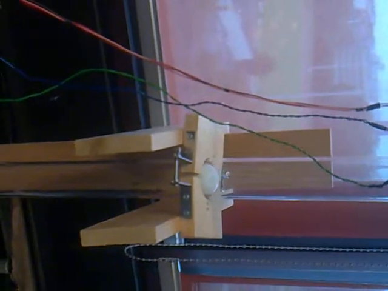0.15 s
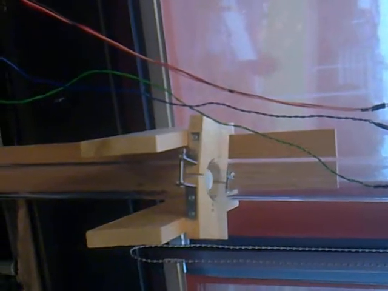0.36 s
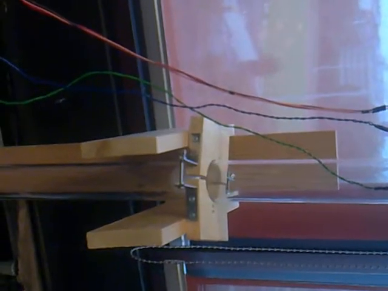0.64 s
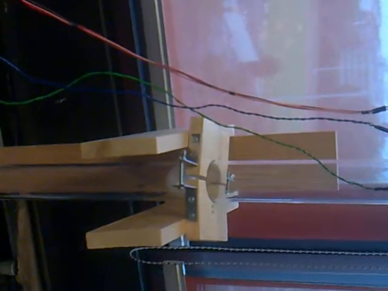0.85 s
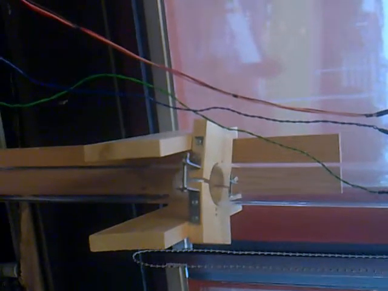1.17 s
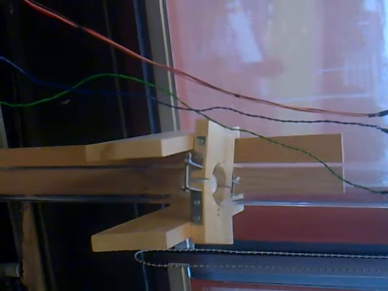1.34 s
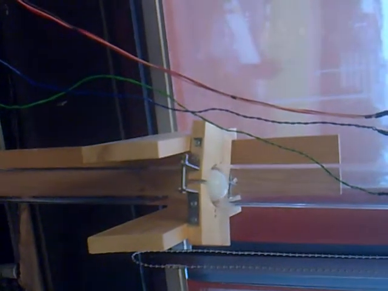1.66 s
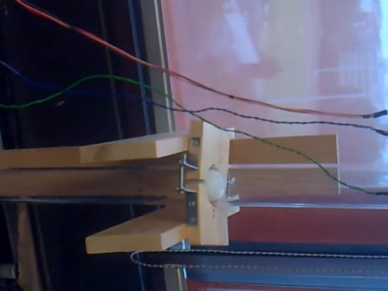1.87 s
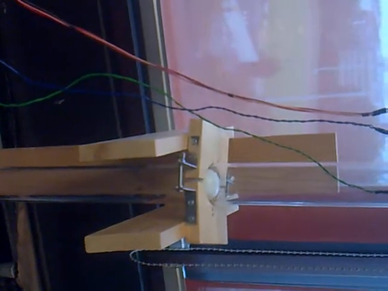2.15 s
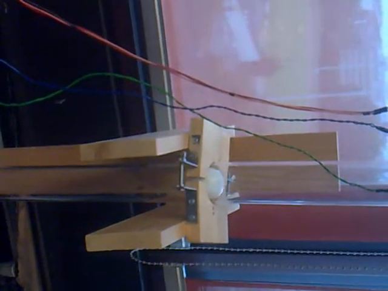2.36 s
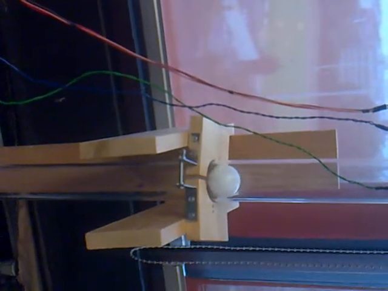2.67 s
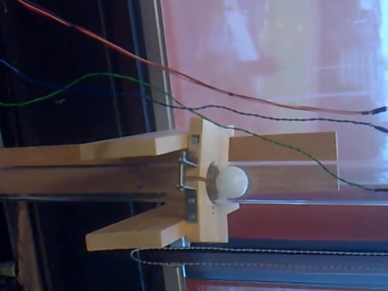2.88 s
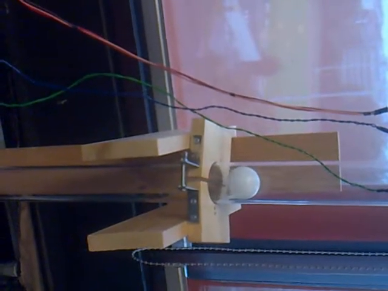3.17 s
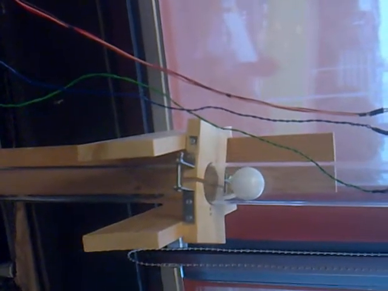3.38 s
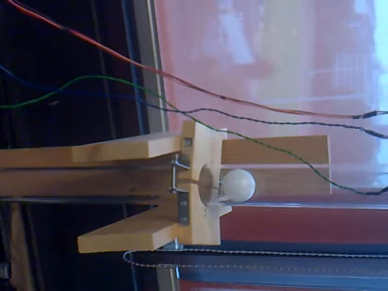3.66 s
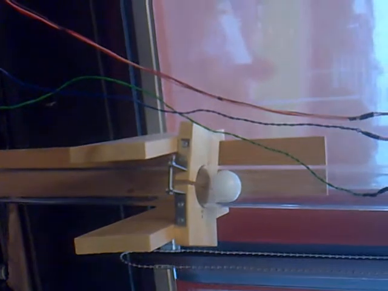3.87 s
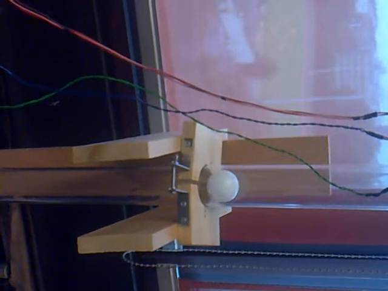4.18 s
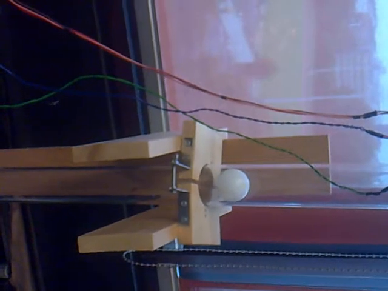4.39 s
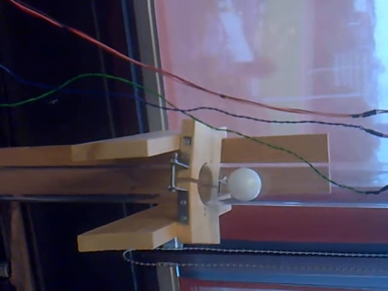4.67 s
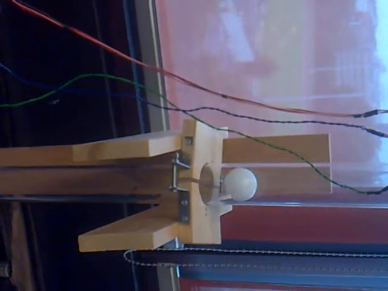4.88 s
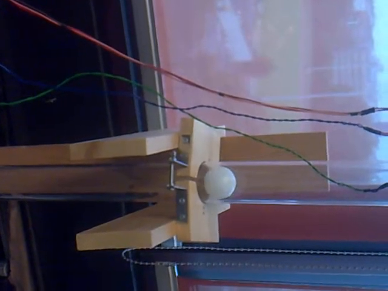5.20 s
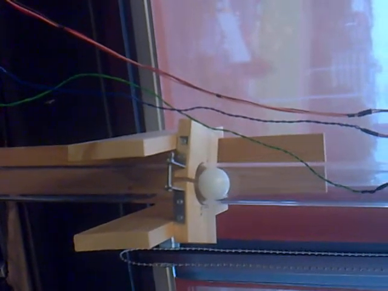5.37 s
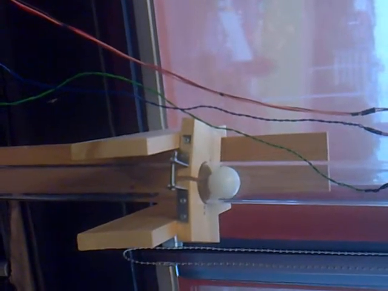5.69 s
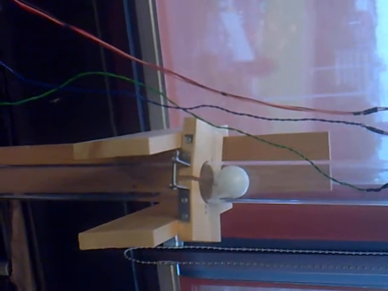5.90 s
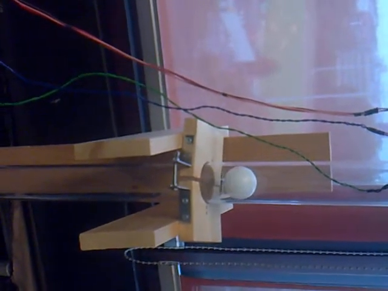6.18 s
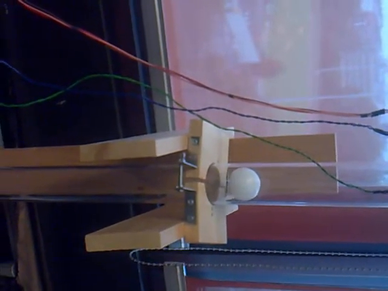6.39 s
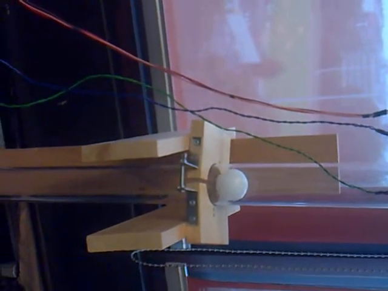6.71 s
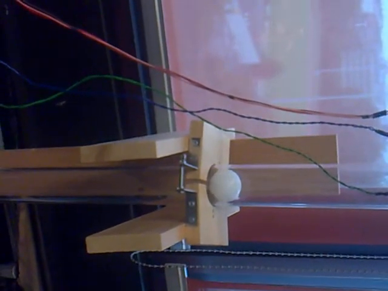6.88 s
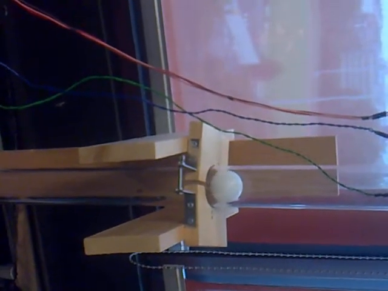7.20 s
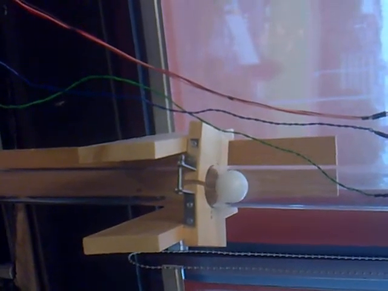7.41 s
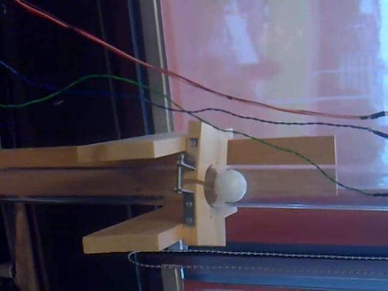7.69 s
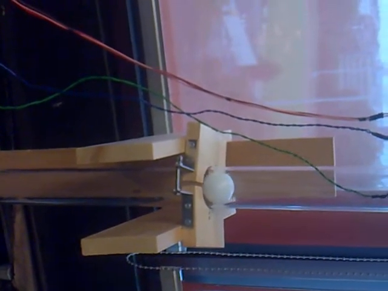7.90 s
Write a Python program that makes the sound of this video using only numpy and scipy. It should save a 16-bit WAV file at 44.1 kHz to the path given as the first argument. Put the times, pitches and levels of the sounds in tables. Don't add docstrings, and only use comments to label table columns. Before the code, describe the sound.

A faint, steady hiss of a fan and air jet, with a thin wavering motor hum, runs throughout a hard-walled room. A light hollow ball strikes a wooden stop with a moderate clack at 0.2 s, a weaker glance following, then faint touches and a duller knock at 1.35 s. Around 2.1-2.3 s comes a soft quick flurry while the tube very faintly drones low. At 3.4 s a tight triple rap cracks out, by far the loudest, with a low woody boom, followed by another knock at 3.55 s. Light touches lead to a double rap at 4.4 s and a soft knock at 4.95 s. Firm knocks land at 5.77 and 6.17 s, then a quiet patter from 6.7 to 7.1 s and barely audible taps until about 7.7 s. Hiss continues to 8 s. Every hit is indirect, blooming into brief, dense echoes that decay within half a second.

```python
import sys
import numpy as np
from scipy import signal
from scipy.fft import rfft, irfft
from scipy.io import wavfile
from scipy.ndimage import uniform_filter1d

SR = 44100
rng = np.random.default_rng(int(sys.argv[2]) if len(sys.argv) > 2 else 0)


def magnitude_from_level(level_db):
    exponent = np.asarray(level_db, float) / 20
    return 10 ** exponent


def dump_mix(stems):
    frames = np.atleast_2d(stems).T
    limited = np.clip(frames, -1, 1)
    pcm = np.round(limited * 32767).astype(np.int16)
    wavfile.write(sys.argv[1], SR, pcm)


N = 355005


def evened(x):
    return x / np.sqrt(np.mean(x ** 2, axis=-1, keepdims=True) + 1e-20)


def read(points, hz):
    f, value = np.transpose(points)
    return np.interp(np.log(hz + 1), np.log(f + 1), value)


def bump(hz, centre_hz, width_hz):
    return 1 / (1 + (2 * (hz - centre_hz) / width_hz) ** 2)


def modes_db(hz, modes, shares=1):
    centre_hz, width_hz, lift_db = np.transpose(modes)[..., None]
    return (shares * lift_db.T) @ bump(hz, centre_hz, width_hz)


def causal(db):
    cepstrum = irfft(db * np.log(10) / 20)
    half = cepstrum.shape[-1] // 2
    fold = np.r_[1, 2 * np.ones(half - 1), 1, np.zeros(half - 1)]
    return irfft(np.exp(rfft(cepstrum * fold)))


def fuzzy(t, centre_hz, width_hz, fuzz):
    r = np.exp(-np.pi * width_hz / SR)
    slow = signal.lfilter([1], [1, -r], rng.standard_normal((len(t), 2)) @ [1, 1j])
    wander = 1 + fuzz * slow / abs(slow).mean()
    return evened((wander * np.exp(2j * np.pi * centre_hz * t)).real)


def knocks(hold=1.42, uneven=0.69, gain_db=-12.5):
    # (frequency [Hz], level [dB per Hz])
    blow_spectrum = [(35, -24), (70, -14), (130, -12.5), (350, -4.5), (520, -5), (800, -2), (1400, -0.5),
                     (2100, 0.5), (2750, -7), (3600, -9.5), (5000, -11.5), (7000, -19.5), (10500, -30.5),
                     (15600, -42.5)]
    # (frequency [Hz], width [Hz])
    board_ring = (1960, 300)
    # (frequency [Hz], width [Hz], lift [dB])
    frame_modes = [(96.4, 24, 7.5), (135, 27, 4), (205, 7.3, 2.5), (325, 22, 2.5), (382, 96, 5.5),
                   (653, 11.5, 9), (883, 15.5, 6.5), (993, 29, 4), (1138, 16, 2), (1310, 35, 0.5),
                   (1477, 37, 4.5), (1680, 5, 6.5), (1928, 45, 5), (2173, 32, 0.5)]
    near_db, near_s = 2, 0.04

    start_s, blow_db, snap_db, ring_db, thud_db, build_s = contacts().T[..., None]
    hz = np.fft.rfftfreq(4096, 1 / SR)
    thud_band = 1 / (1 + (hz / 900) ** 3)
    snap_band = np.log2(1 + (hz / 2600) ** 3) / 5.0
    shares = 1 + uneven * rng.uniform(-1.22, 1, (len(start_s), len(frame_modes)))
    colour_db = read(blow_spectrum, hz) + modes_db(hz, frame_modes, shares)
    colour_db = colour_db + thud_band * thud_db + snap_band * snap_db
    colour_db = colour_db + ring_db * bump(hz, *board_ring)

    swarm = echoes(count=len(start_s))
    t = np.arange(swarm.shape[1]) / SR
    pile_up = (1 - np.exp(-t / np.clip(build_s, 0.003, 0.05))) ** hold
    swarm = swarm * pile_up * magnitude_from_level(near_db * np.exp(-(t / near_s) ** 2))
    sound = signal.fftconvolve(swarm, causal(np.maximum(colour_db, -100)), axes=1)
    early_rms = np.sqrt(np.mean(sound[:, :3000] ** 2, axis=1, keepdims=True))
    sound = magnitude_from_level(blow_db + gain_db) * sound / early_rms

    out = np.zeros(N + sound.shape[1])
    for start, one in zip(start_s[:, 0], sound):
        at = round(start * SR)
        out[at:at + len(one)] += one
    return out[:N]


def contacts():
    # (start [s], blow [dB], shell snap [dB], board ring [dB], frame thud [dB])
    square_hits = [(.227, -22.5, 6.5, -0.5, 1.5), (2.176, -32, 0.5, 7.5, 6), (2.217, -33.5, 2, 11.5, 7),
                   (2.27, -33, 2, -7, 4), (4.96, -29, -3.5, 1, -0.5), (5.767, -14, 6.5, -.5, 2),
                   (6.166, -15, 6, -1.5, .5), (6.682, -37, -1.5, -6, 0.5), (6.772, -29, 2, -4.5, 0.5),
                   (6.855, -28, 5, 0, 1.5), (6.945, -33.5, 6, 3, 9), (7.071, -32, 8, 3, -5)]
    # (start [s], blow [dB], snap [dB], ring [dB], thud [dB])
    edge_raps = [(2.293, -30, -8, 2, -1.5), (3.398, -13, -5, 5, 0), (3.417, -6.5, -5, 3, -9.5),
                 (3.431, -3, -2, 6, -3.5), (3.559, -15, 3.5, 1.5, 4.5), (3.601, -30, 3, 1, -5),
                 (4.079, -31, 6.5, 8.5, 0), (4.409, -20.5, 5, 4, 2), (4.418, -17.5, -2, -1, -3),
                 (6.41, -39.5, 1, 0, 6), (6.821, -34.5, 7, 1, 5), (7.711, -38, 0, -9, -4)]
    # (start [s], blow [dB], snap [dB], ring [dB], thud [dB])
    far_glances = [(.35, -32, -9, -7, 0.5), (1.347, -19, 4.5, -1.5, 0), (2.09, -43, 9, -4, 12),
                   (2.893, -35.5, 0, 4, 4), (3.141, -34.5, -7, 2, -3), (3.236, -25.5, 2.5, -1, 6),
                   (3.263, -24.5, -10, -2, -6.5), (4.052, -33.5, -1, -6, 2), (5.263, -33, 9, 1.5, 1.5),
                   (5.404, -31.5, -0.5, -3, 0), (5.618, -35, 3, 4.5, 2), (7.265, -40, -.5, 1, 2),
                   (7.666, -40, 2, 1, -15)]
    # (start [s], blow [dB], shell snap [dB])
    rim_touches = [(.13, -58, -3.5), (.621, -46.5, -13.5), (1.225, -50, 12), (1.62, -46.5, -5),
                   (2.0, -52, 7), (2.75, -41, -4), (2.79, -40.5, -7.5), (3.029, -45, -7), (3.08, -45, 0),
                   (3.72, -60, -4), (3.869, -51, 12), (4.21, -42, 4), (4.298, -40, -1), (4.385, -38, 3),
                   (5.52, -43, 9), (6.61, -60, 9.5), (7.37, -46.5, 3), (7.45, -44.5, 6)]
    plain_touches = [(*row, 0, 0) for row in rim_touches]
    kinds = [(edge_raps, 0.0057), (square_hits, 0.012), (far_glances, 0.023), (plain_touches, 0.013)]
    return np.array(sorted((*row, build_s) for rows, build_s in kinds for row in rows))


def echoes(count, taps_per_s=5000, spread_db=1.0, late_db=-31.0, late_slower=1.66):
    # (frequency [Hz], decay by 60 dB [s])
    room_t60 = [(100, 0.89), (260, 0.49), (700, 0.46), (1840, 0.46), (4850, 0.42), (12000, 0.34)]
    size = 36000
    hit, sign, strength = rng.random((count, size, 3)).transpose(2, 0, 1)
    taps = np.clip((taps_per_s / SR - hit) * 200 + 0.5, 0, 1) * np.sign(sign - 0.5)
    taps = taps * magnitude_from_level(-spread_db * np.log(strength + 0.0014))
    hz, t, z = signal.stft(taps, SR, nperseg=256)
    fall_db = -60 * t / read(room_t60, hz)[:, None]
    decay = magnitude_from_level(fall_db) + magnitude_from_level(late_db + fall_db / late_slower)
    return signal.istft(z * decay, SR, nperseg=256)[1][:, :size]


def booms(rise_s=0.01247, gain_db=-0.5):
    # (time [s], peak level [dB], frequency [Hz])
    boom_hits = [(1.359, -30.5, 130.6), (2.195, -40.5, 148), (2.289, -46, 86.1), (3.424, -30, 128),
                 (3.569, -50, 87), (4.425, -33.5, 206.4), (4.968, -51, 135), (5.775, -33, 123),
                 (6.18, -48, 97), (0.234, -30, 393), (3.442, -11, 340.6), (3.565, -19.5, 373),
                 (4.421, -42, 378), (5.78, -25, 305), (6.18, -18.5, 378.4)]
    out, t = np.zeros(N), np.arange(SR) / SR
    for start_s, peak_db, hz in boom_hits:
        t60 = np.clip(0.43 * (hz / 100) ** -0.77, 0.1, 1)
        envelope = (1 - np.exp(-t / rise_s)) ** 2 * magnitude_from_level(peak_db + gain_db - 60 * t / t60)
        at = round((start_s - rise_s / 2) * SR)
        out[at:][:SR] += envelope * np.sin(2 * np.pi * hz * t)
    return out


def drone():
    peak_s, swell_s, drop_s, hold_s, release_s = 2.244, 0.16, 0.065, 0.24, 0.15
    peak_db, hold_db, edge_db = -46, -58, -72
    corner_s = peak_s - swell_s + np.cumsum([0, swell_s, drop_s, hold_s, release_s])
    level_db = [edge_db, peak_db, hold_db, hold_db, edge_db]
    t = np.arange(corner_s[0], corner_s[-1], 1 / SR)
    tone = fuzzy(t, 196, width_hz=15.0, fuzz=0.93)
    level = magnitude_from_level(np.interp(t, corner_s, level_db)) * np.hanning(len(t)) ** 0.3
    out = np.zeros(N)
    out[round(corner_s[0] * SR):][:len(t)] = level * tone
    return out


def fan(level_db=-57, patchy_db=0.4, swell_db=0.15):
    # (frequency [Hz], level [dB per Hz])
    hiss_spectrum = [(18, -4.5), (45, 4), (75, -9.5), (200, -3), (250, -11.5), (450, -11.5), (600, -11),
                     (1500, -8.5), (1800, -10), (2300, -11), (2650, -16.5), (5400, -25.5), (10000, -30),
                     (15600, -25.5)]
    # (frequency [Hz], width [Hz], lift [dB])
    room_modes = [(107, 22, 10), (139, 17, -1), (200, 22, 1.5), (271, 12, 8.5), (328, 16, 13.5),
                  (414, 16.3, 12.5), (1060, 14, 9.5), (1323, 9, 10), (1577, 34, 6.5), (2090, 120, 4)]
    # (time [s], level [dB])
    jet_strength = [(0, 0.5), (1, 0.), (1.9, 1.5), (2.65, 2), (3.9, 2), (4.8, 1.5), (5.7, 2), (6.6, 2),
                    (7.55, 1), (8.05, 0)]
    frames, hz = N // 1024 + 5, np.fft.rfftfreq(4096, 1 / SR)
    a, b, patches = rng.standard_normal((frames, 2049, 3)).T
    noise = a + 1j * b
    patches = uniform_filter1d(uniform_filter1d(patches, size=40, axis=0), size=4, axis=1)
    swell = evened(uniform_filter1d(rng.standard_normal(frames), size=4))
    jet_db = np.interp(np.arange(frames) * 1024 / SR, *np.transpose(jet_strength))
    jet_share = np.clip(np.log(hz / 300 + 1e-3), 0, 1) * np.clip(np.log(14000 / (hz + 1)), 0, 1)
    field_db = (read(hiss_spectrum, hz) + modes_db(hz, room_modes)[0])[:, None]
    field_db = field_db + patchy_db * patches / patches.std() + swell_db * swell
    moving_db = field_db + jet_share[:, None] * jet_db
    still = signal.istft(noise * magnitude_from_level(field_db), nperseg=4096, noverlap=3072)[1][:N]
    hiss = signal.istft(noise * magnitude_from_level(moving_db), nperseg=4096, noverlap=3072)[1][:N]
    return magnitude_from_level(level_db) * hiss / still.std()


def hum():
    # (frequency [Hz], width [Hz], level [dB])
    motor_lines = [(140, 5., -67), (339, 2.3, -68), (279, 3.8, -71.5)]
    t = np.arange(N) / SR
    return sum(magnitude_from_level(db) * fuzzy(t, hz, width_hz, fuzz=1.0) for hz, width_hz, db in motor_lines)


def scene():
    return (knocks() + booms() + drone() + fan() + hum())[None]


def band_limit(x):
    return signal.sosfilt(signal.butter(12, 15730, fs=SR, output="sos"), x)


def record(dry, knee_db=-15.5, squeeze=0.26, recover_db_per_s=35.0):
    power_db = 10 * np.log10(abs(uniform_filter1d(dry[0] ** 2, size=900, origin=449)) + 1e-12)
    fall_db = np.arange(N) * recover_db_per_s / SR
    held_db = np.maximum.accumulate(power_db + fall_db) - fall_db
    over_db = np.maximum(held_db - knee_db, 0)
    ducked = dry / magnitude_from_level(squeeze * uniform_filter1d(over_db, size=600, origin=299))
    return band_limit(ducked)


dry = scene()
out = record(dry)
dump_mix(out)
```